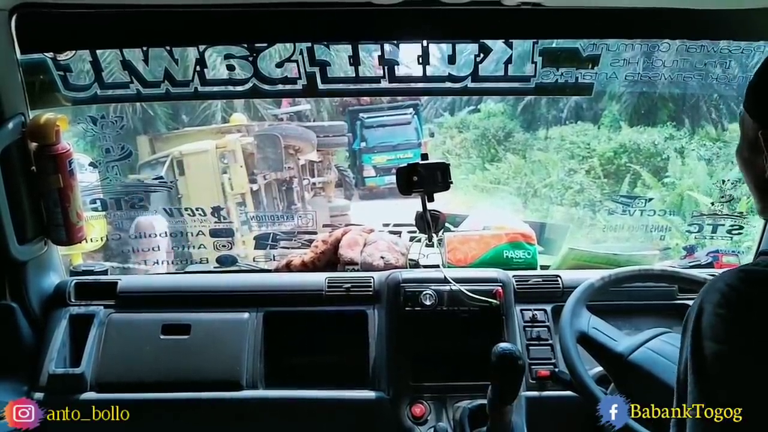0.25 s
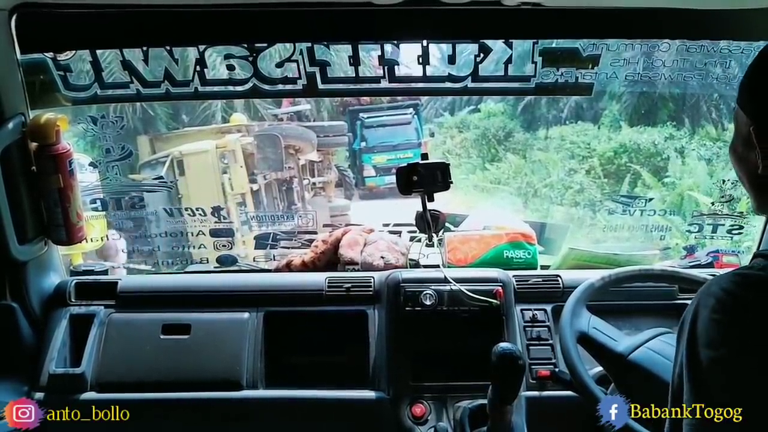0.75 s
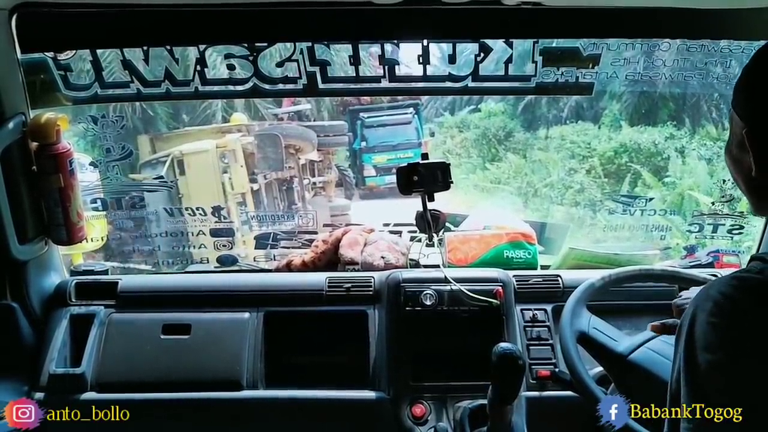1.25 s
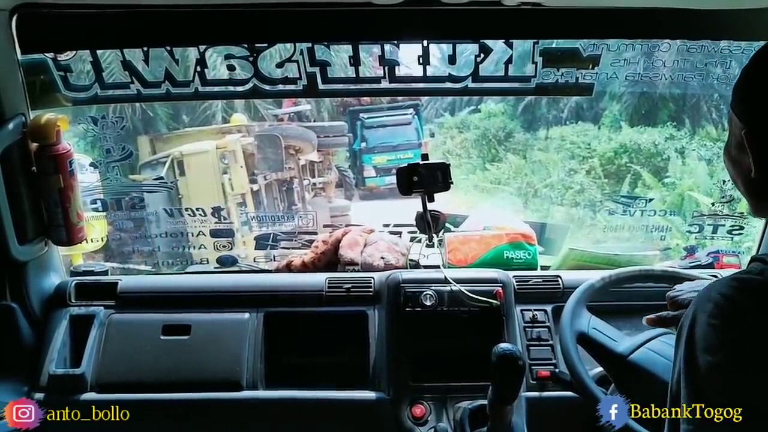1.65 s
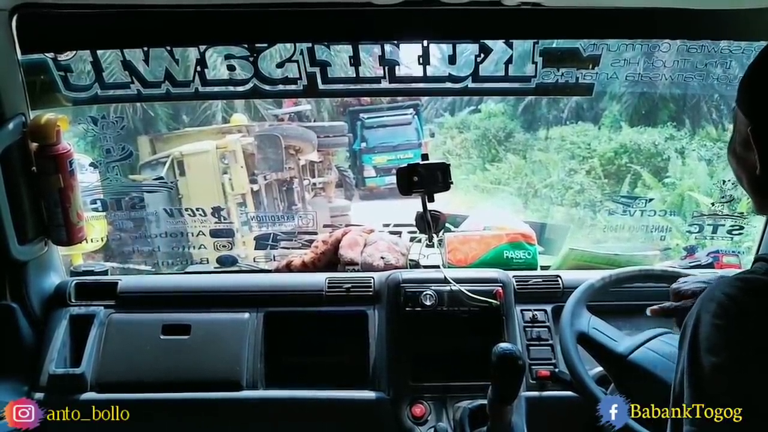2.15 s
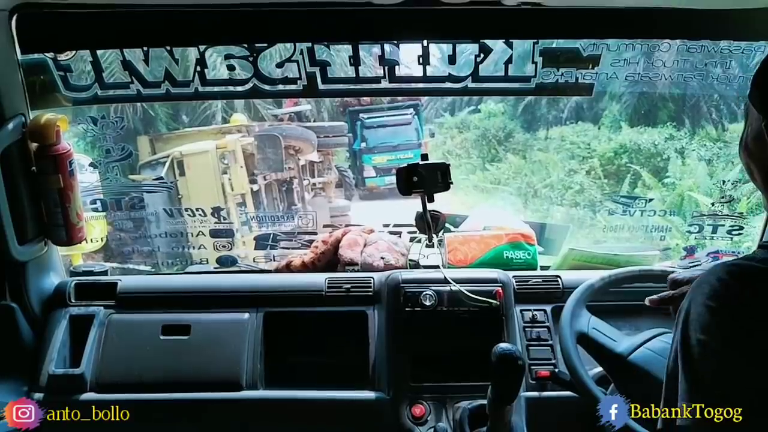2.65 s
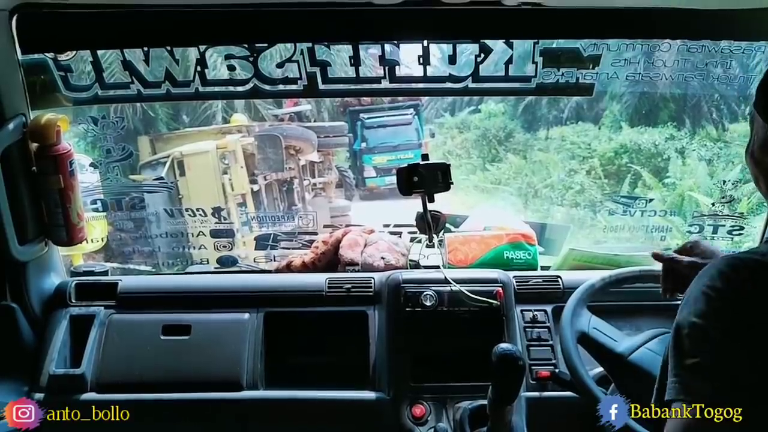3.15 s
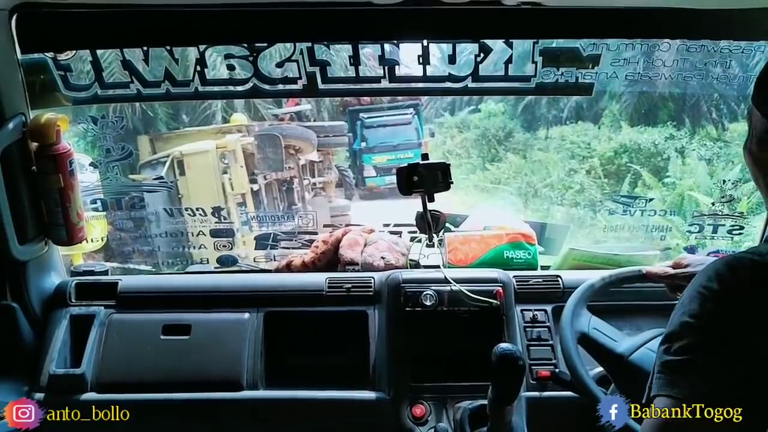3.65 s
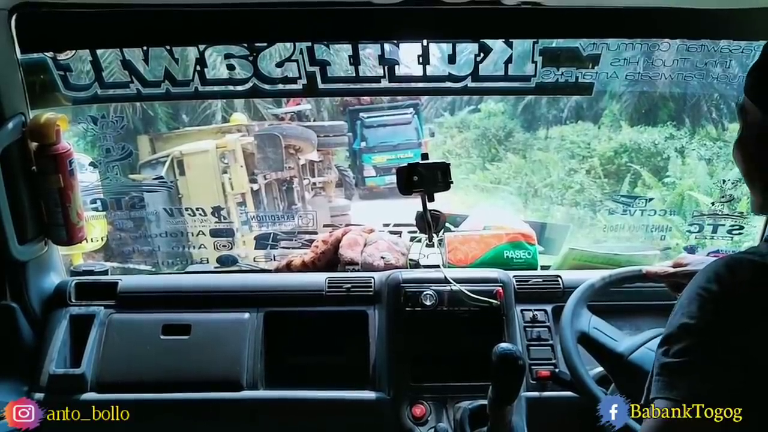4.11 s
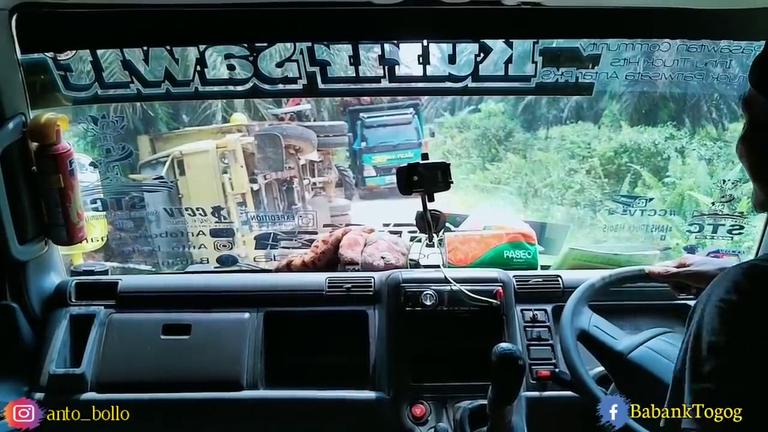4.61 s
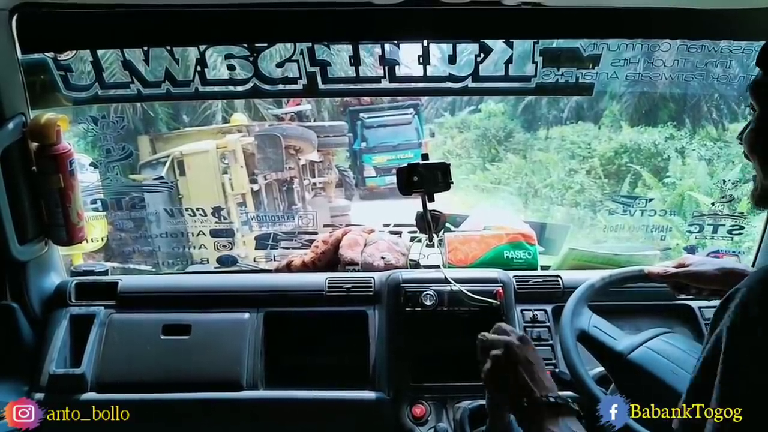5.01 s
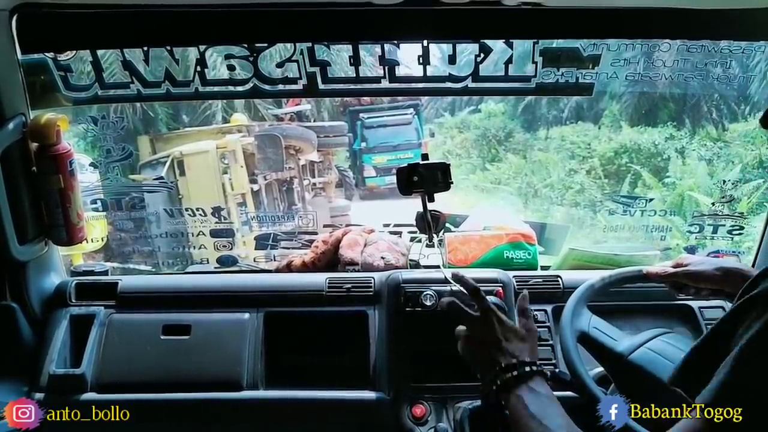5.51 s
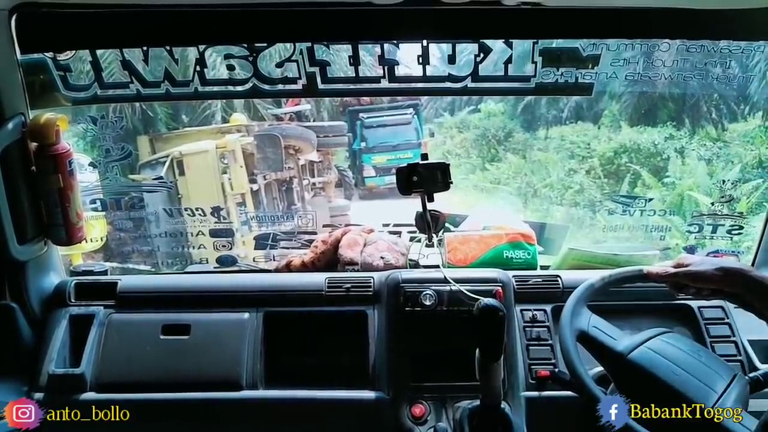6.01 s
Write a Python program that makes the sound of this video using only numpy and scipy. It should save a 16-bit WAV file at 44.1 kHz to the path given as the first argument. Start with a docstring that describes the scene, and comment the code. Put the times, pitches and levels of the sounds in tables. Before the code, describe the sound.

A loud two-note truck air horn holds about a second and a half, sags off, then a diesel idles with cab thumps before pulling away.

```python
"""Two truck horns, about a whole tone apart, hold one long note, then sag as the air runs out.
Each is a stack of sine partials plus escaping air; a valve cracks a noise burst as they open.
In the cab a diesel idles: jittered knocks ring the block, rattle the panels and shake the cab.
The driver shifts about and puts it in gear: thumps, rattling fittings and soft rustles.
At the end the cab starts to rumble along the road, with creaks and a low engine drone."""
import sys
import numpy as np
from scipy import signal
from scipy.fft import rfft, irfft
from scipy.io import wavfile
from scipy.ndimage import uniform_filter1d, minimum_filter1d

SR = 44100
rng = np.random.default_rng(int(sys.argv[2]) if len(sys.argv) > 2 else 0)


def waveform_to_disk(signal):
    """Save audio, clipped to [-1, 1], as 16-bit WAV at the path in sys.argv[1]."""
    frames = np.transpose(np.atleast_2d(signal))
    scaled = np.clip(frames, -1, 1) * 32767
    samples = np.round(scaled).astype(np.int16)
    wavfile.write(sys.argv[1], SR, samples)


N = 276507
T = np.arange(N) / SR
FREQS = np.maximum(np.arange(N // 2 + 1) * SR / N, 1)


def undb(db):
    """Decibels to gain."""
    return 10 ** (np.asarray(db) / 20)


def unit(x):
    """Scale to rms 1."""
    return x / np.sqrt(np.mean(x ** 2))


def colour(points, hz=FREQS):
    """Gain of a (Hz, dB) spectrum, joined by straight lines over log frequency."""
    f, db = np.transpose(points)
    return undb(np.interp(np.log(hz), np.log(f), db))


def shaped(x, gain):
    """Filter by a frequency response; rms 1."""
    return unit(irfft(rfft(x) * gain, N))


def noise(apart_hz=900):
    """Stereo noise, alike in the bass and drifting apart above apart_hz."""
    mid, side = rfft(rng.standard_normal((2, N)))
    side = side * FREQS / np.hypot(FREQS, apart_hz)
    return unit(irfft(np.array([mid + side, mid - side]), N))


def walk(rate_hz):
    """Smooth random wander of spread 1."""
    return shaped(rng.standard_normal(N), 1 / (1 + (FREQS / rate_hz) ** 4))


def swell(start_s, rise_s, decay_s):
    """A straight rise followed by an exponential decay."""
    rise = np.clip((T - start_s) / rise_s, 0, 1)
    return rise * np.exp(-np.maximum(T - start_s - rise_s, 0) / decay_s)


def resonances(modes):
    """Frequency response of (Hz, width Hz, dB) modes."""
    return sum(undb(db) / (1 + 2j * (FREQS / hz - hz / FREQS) * hz / (2 * width))
               for hz, width, db in modes)


def band(hz, octaves):
    """Frequency response of a flat-topped band; the gain halves at this many octaves either side."""
    return 1 / (1 + (np.log2(FREQS / hz) / octaves) ** 4)


def ringing(push, decay_s):
    """Pushes ring a body with many close modes, the same ones for every push."""
    body = (noise() * np.exp(-T / decay_s))[:, :SR // 5]
    return signal.fftconvolve(push[None], body)[:, :N]


SURGE_BELOW_HZ, SURGE_DB = 435, 4.5  # only the bass of the cab noise surges
# tone of the cab noise: pitch_hz, level_db (relative)
CAB_TONE = [(15, -5.5), (42, 2.5), (90, -12.5), (140, -12), (200, -24), (320, -16.5), (700, -22.5),
            (2800, -28), (4300, -36.5), (7000, -38.5), (9000, -34.5)]


def cab_noise():
    """Low cab noise: filtered noise with a surging bass and a steadier hiss above it."""
    bass = 1 / (1 + (FREQS / SURGE_BELOW_HZ) ** 4)
    low = undb(-44.0) * shaped(noise(apart_hz=600), colour(CAB_TONE) * bass) * undb(SURGE_DB * walk(15))
    hiss = shaped(noise(apart_hz=600), colour(CAB_TONE) * (1 - bass)) * undb(2.0 * walk(5.9))
    return low + undb(-59.5) * hiss


ROLL_S, ROLL_RISE_S, ROLL_DB = 5.972, .085, -24.5
LURCH_DB, LURCH_S = 5.5, 0.093  # extra level as the truck sets off, and how long it lasts
RUMBLE_DB, RUMBLE_LUMP_DB = -1, 3  # level within the roll, and random swing
CREAK_FROM_HZ, CREAK_DB, CREAK_LUMP_DB = 535, -16, 5.5  # creaks sit above the rumble
# tone of the moving cab: pitch_hz, level_db (relative)
ROAD_TONE = [(15, -3), (50, 2), (95, -7), (136, -5), (230, -17), (300, -12), (420, -34), (1500, -27),
             (2400, -29), (4000, -50), (7500, -47), (15500, -65)]
# engine drone as it pulls: pitch_hz, level_db (within the roll)
PULL_DRONE = [(33, -7), (65, -7), (133, -5)]


def road():
    """The truck rolls: lumpy low rumble, body creaks in uneven bursts, and the engine pulling."""
    age = np.maximum(T - ROLL_S, 0)
    lurch_db = LURCH_DB * np.exp(-(age / LURCH_S) ** 4)
    roll = np.minimum(age / ROLL_RISE_S, 1) * undb(ROLL_DB + lurch_db)
    rumble_tone = colour(ROAD_TONE) / (1 + (FREQS / CREAK_FROM_HZ) ** 4)
    rumble = shaped(noise(apart_hz=440) * undb(RUMBLE_LUMP_DB * walk(36)), rumble_tone)
    # bands half an octave apart creak each on their own, then ring briefly
    centres = CREAK_FROM_HZ * np.sqrt(2) ** np.arange(10)
    creaks = sum(colour(ROAD_TONE, hz) * np.sqrt(hz) * shaped(noise(), band(hz, 0.3))
                 * undb(CREAK_LUMP_DB * walk(13)) for hz in centres)
    creaking = unit(ringing(creaks[0], 0.01))
    drone = sum(undb(db) * np.sin(2 * np.pi * hz * T + 0.31 * walk(3.1)) for hz, db in PULL_DRONE)
    return (undb(RUMBLE_DB) * rumble + undb(CREAK_DB) * creaking + drone) * roll


# soft rustles as the driver moves:
# start_s, level_db, centre_hz, half_width_octaves, rise_s, decay_s
DRIVER_RUSTLES = [(3.263, -50, 11000, 0.66, .005, 0.16), (3.322, -39, 9000, 0.5, 0.005, 0.027),
                  (5.628, -46.5, 7800, 1, 0.0098, 0.059), (5.768, -49, 11200, .4, .007, .023),
                  (5.978, -43.5, 7300, 0.24, 0.022, 0.12)]


def rustles():
    """Soft rubbing: short bands of noise with a fine grain."""
    out = np.zeros((2, N))
    grain = undb(4 * walk(250))
    for start, db, hz, octaves, rise, decay in DRIVER_RUSTLES:
        out += undb(db) * swell(start, rise, decay) * shaped(noise() * grain, band(hz, octaves))
    return out


RING_WIDTH = 0.07  # share of the ring frequency
CONTACT_DB = -6  # the broad knock under a rattle's ring
# loose cab fittings: start_s, level_db, ring_hz
LOOSE_FITTINGS = [(2.588, -38.5, 291), (3.527, -41, 806), (3.588, -42, 730), (5.17, -43.5, 673),
                  (5.645, -37.5, 1100), (5.697, -42, 1030), (5.981, -33.5, 313), (6.007, -41, 800),
                  (6.078, -45, 1750), (6.106, -44, 2080)]


def rattles():
    """Loose fittings knock and ring: noise bursts through one narrow mode over a broad band."""
    out = np.zeros((2, N))
    for start, db, hz in LOOSE_FITTINGS:
        response = (resonances([(hz, hz * RING_WIDTH, 0)]) + undb(CONTACT_DB)) * band(hz, 0.69)
        out += undb(db) * swell(start, 0.0072, 0.028) * shaped(noise(), response)
    return out


BOOM_HZ, BOOM_OCTAVES, BOOM_DECAY_S = 127, 0.29, 0.071
BOOM_DB = -13.5  # relative to the thump
# the driver shifts, works the gear lever and pulls away: start_s, ring_hz, level_db, decay_s
DRIVER_THUMPS = [(2.319, 47, -29.5, 0.012), (3.023, 58, -25, 0.011), (3.203, 64.3, -31, 0.022),
                 (4.873, 141.8, -22, 0.049), (4.922, 190, -24.5, 0.013), (5.003, 48, -24, 0.043),
                 (5.037, 125, -28.5, 0.013), (6.014, 49.4, -22, 0.034)]


def thumps():
    """Dull decaying sine thumps; the cab floor answers every one with a noise boom."""
    out = np.zeros((2, N))
    boom = undb(BOOM_DB) * shaped(noise(), band(BOOM_HZ, BOOM_OCTAVES))
    for start, hz, db, decay in DRIVER_THUMPS:
        thump = swell(start, 0.0089, decay) * np.sin(2 * np.pi * hz * (T - start))
        out += undb(db) * (thump + swell(start, 0.0135, BOOM_DECAY_S) * boom)
    return out


# cab shaking with the engine: multiple of the knock rate, level_db
SHAKE_ORDERS = [(1, -50), (2, -53), (3, -52), (5, -62), (7, -57)]


def cab_shake(count):
    """The cab shakes with the engine: wavering sines at multiples of the knock rate."""
    out = np.zeros(N)
    for k, db in SHAKE_ORDERS:
        angle = 2 * np.pi * (k * count + rng.random()) + 0.56 * walk(5.1)
        out += undb(db + 0.82 * walk(3.5)) * np.sin(angle)
    return np.sqrt(2) * out


# cab panel resonances: pitch_hz, level_db
PANEL_MODES = [(385, -63), (540, -61), (830, -58.5), (1170, -61.5), (1660, -62.5), (2050, -66.5)]


def panel_buzz(age, shake_db, scatter):
    """Panels answer each knock a little late, and each time differently."""
    jolt = age * np.exp(-(age / 0.021) ** 2) * undb(shake_db)
    out = np.zeros((2, N))
    for hz, db in PANEL_MODES:
        response = resonances([(hz, hz / 16, 0)]) * band(hz, .5)
        out += undb(db) * shaped(noise() * jolt * undb(3 * scatter()), response)
    return out


# tone of the knock clatter: pitch_hz, level_db (relative)
CLATTER_TONE = [(400, -17), (1300, -18), (2100, -9), (2400, -2), (2900, 0), (3400, -7), (3900, -14),
                (4300, -35), (6800, -26), (8300, -39), (15000, -45)]


def clatter(age, force_db):
    """Each knock's short burst of pushes rings a dense set of modes."""
    push = rng.standard_normal(N) * np.exp(-age / .0045) * undb(force_db)
    return undb(-50) * shaped(ringing(push, .014), colour(CLATTER_TONE))


BLOCK_DB, MODE_SCATTER_DB = -46.5, 1.5  # scatter of the lowest mode; less for higher ones
COVER_HZ = 3580  # the engine cover holds back the block's ring above this
# modes of the engine block: pitch_hz, width_hz, level_db (relative)
BLOCK_MODES = [(296, 35, -3), (2380, 29, -7), (2560, 38, -3), (2750, 50, -5), (2970, 34, -6),
               (3310, 73, -10)]


def block_ring(knock, scatter):
    """Knocks strike the modes of the block, each time differently, the low ones most."""
    cover = 1 / (1 + (FREQS / COVER_HZ) ** 16)
    lowest_hz = BLOCK_MODES[0][0]
    out = np.zeros((2, N))
    for hz, width, db in BLOCK_MODES:
        strike = undb(MODE_SCATTER_DB * (lowest_hz / hz) ** 0.21 * scatter())
        out += undb(db) * shaped(noise() * knock * strike, resonances([(hz, width, 0)]) * cover)
    return undb(BLOCK_DB) * unit(out)


IDLE_HZ, FAST_IDLE_HZ = 16.905, 17.16  # knocks per second
FAST_FROM_S, FAST_UNTIL_S = 2.2, 4.32  # for a while the idle runs faster
FIRST_KNOCK_S = -.0115  # before jitter
KNOCK_JITTER_S, KNOCK_SCATTER_DB = 0.00051, 1.4
KNOCK_RISE_S, KNOCK_DECAY_S = .0025, .024
EASE_FROM_S, EASE_DB_PER_S = 0.99, 1.16  # force of the knocks: steady, then easing off
SLOW_IDLE_SHAKE_DB = 4.5  # the panels shake harder once the idle drops again
TICK_HZ, TICK_OCTAVES, TICK_DB = 6930, 0.12, -68.5
# knock force of each cylinder, in firing order: level_db
CYLINDER_FORCE = [4, 1.5, 3, -0.5]


def diesel():
    """Combustion knocks, uneven from cylinder to cylinder, ring the block and shake the cab."""
    rate = np.where((T > FAST_FROM_S) & (T < FAST_UNTIL_S), FAST_IDLE_HZ, IDLE_HZ)
    count = np.cumsum(rate) / SR + (KNOCK_JITTER_S * walk(9.9) - FIRST_KNOCK_S) * IDLE_HZ
    index = count.astype(int)
    age = count % 1 / rate  # seconds since the last knock
    cylinder_db = np.array(CYLINDER_FORCE)[index % len(CYLINDER_FORCE)]

    def scatter():
        """One random value for each knock."""
        return rng.standard_normal(index[-1] + 1)[index]

    ease_db = -EASE_DB_PER_S * np.maximum(T - EASE_FROM_S, 0)
    force_db = ease_db + KNOCK_SCATTER_DB * scatter() + cylinder_db
    knock = np.minimum(age / KNOCK_RISE_S, 1) * np.exp(-(age / KNOCK_DECAY_S) ** 1.5) * undb(force_db)
    shake_db = force_db + cylinder_db / 2 + SLOW_IDLE_SHAKE_DB * (T > FAST_UNTIL_S)
    # a faint high tick with each knock
    tick_noise = noise() * np.sqrt(knock) * undb(3.3 * scatter() + 2 * walk(120))
    tick = undb(TICK_DB) * shaped(tick_noise, band(TICK_HZ, TICK_OCTAVES))
    engine = block_ring(knock, scatter) + clatter(age, force_db) + tick
    return engine + panel_buzz(age, shake_db, scatter) + cab_shake(count)


OPEN_S, CLOSE_S = .2047, 1.813  # the horn valve opens and closes
# tone of the valve crack: pitch_hz, level_db (relative)
CRACK_TONE = [(110, -44), (550, 4.5), (893, -5), (1480, -5), (1600, -8.5), (2450, -3.5), (2970, -6),
              (3900, -21.5), (6590, -13.5), (7840, -24.5), (15500, -43.5)]
# puffs of air from the horn line:
# start_s, level_db, centre_hz, half_width_octaves, rise_s, decay_s
AIR_PUFFS = [(0.253, -45.5, 10050, 0.37, 0.016, 0.025), (.255, -31, 7020, 0.1, 0.012, 0.017),
             (1.78, -34, 6640, 0.29, 0.0025, 0.021), (2.125, -41.5, 2030, 0.37, 0.068, 0.08),
             (2.13, -39.5, 1990, 0.017, 0.026, 0.085)]


def valve():
    """The valve slams open: a noise crack with a faint tail; the line puffs as it fills and empties."""
    tail = undb(-22) * swell(0.191, 0.04, 0.15)
    burst = swell(OPEN_S, 0.0014, 0.013) + tail
    out = undb(-7.0) * burst * shaped(noise(apart_hz=1230), colour(CRACK_TONE))
    for start, db, hz, octaves, rise, decay in AIR_PUFFS:
        out += undb(db) * swell(start, rise, decay) * shaped(noise(), band(hz, octaves))
    return out


BLEED_S = 0.41  # the air line empties in this time
SAG = .024  # share of its pitch that a horn loses as the line empties
BLOOM_S = 0.12  # the upper partials come in this slowly


def line_pressure():
    """Air behind the horns, 0-1: full until the valve closes, then bleeding away."""
    return np.clip(1 - (T - CLOSE_S) / BLEED_S, 0, 1)


def pitch(settled_hz, sharp_hz, half_settled_s):
    """A horn starts sharp, settles, and sags with the pressure."""
    held_hz = settled_hz + sharp_hz / (1 + np.maximum(T - OPEN_S, 0) / half_settled_s)
    return held_hz * (1 - SAG * (1 - line_pressure()))


def blow(delay_s, attack_s, level_power, brightness, bright_power, stall_edge):
    """Horn strength and the multiple above which partials fall away, from powers of the pressure."""
    age = np.maximum(T - OPEN_S - delay_s, 0)
    pressure = (1 - np.exp(-age / attack_s)) * line_pressure()
    edge = brightness * pressure ** bright_power * (1 - np.exp(-age / BLOOM_S))
    return pressure ** level_power, stall_edge + edge


def swing(hz, other_hz, pull, waver):
    """Phase of a diaphragm; over the shared air line each horn tugs the other at their beat rate."""
    phase = 2 * np.pi * np.cumsum(hz * (1 + waver * walk(83))) / SR
    return phase + pull * np.sin(2 * np.pi * np.cumsum(other_hz - hz) / SR)


LEFT_LEAD = 1.6  # radians by which the left side leads for the buzz and the sum tones


def stereo_sine(angle, left_db, right_db, lead):
    """One sine on both sides, the left leading by some radians."""
    return np.array([undb(left_db) * np.sin(angle + lead), undb(right_db) * np.sin(angle)])


# sum tones: multiple of the low note, multiple of the high note, left_db, right_db
AIR_LINE_SUMS = [(1, 1, -35, -47), (2, 1, -43, -46), (3, 1, -38, -50), (2, 2, -39, -38), (1, 4, -48, -38),
                 (5, 1, -47, -36)]


def sum_tones(low_phase, high_phase, low_blow, high_blow):
    """The horns modulate each other through the shared air line; needs both blowing hard."""
    drive, edge = low_blow[0] * high_blow[0], np.minimum(low_blow[1], high_blow[1])
    out = np.zeros((2, N))
    for m, n, left_db, right_db in AIR_LINE_SUMS:
        angle = m * low_phase + n * high_phase + rng.uniform(0, 2 * np.pi)
        size = undb(walk(27)) / np.hypot(1, ((m + n) / edge) ** 2)
        out += size * stereo_sine(angle, left_db, right_db, LEFT_LEAD)
    return np.sqrt(2) * drive * out


STALL_FLUTTER_DB = 2.25  # flutter gained by the fundamental as the air runs out
BUZZ_FLUTTER_DB = 3.2
# cab standing waves that sagging partials slide through: pitch_hz, half_width_hz, level_db
CAB_WAVES = [(645, 7, -12), (1075, 10, -8), (1452, 11, 6), (1634, 7, -5), (1815, 11, -15), (1955, 14, 4),
             (2168, 22, -8)]
# upper partials of both horns: pitch_hz, level_db (relative)
BUZZ_TONE = [(3640, -15), (3980, -21), (4620, -15), (5290, -28), (5610, -11), (6590, -14), (6940, -19),
             (7300, -11), (7600, -16), (7950, -30)]
# air rushing through the horns: pitch_hz, level_db (relative)
AIR_TONE = [(120, -27), (200, -16), (330, -2), (480, -15), (660, -15), (850, -27), (1300, -18),
            (2100, -19.5), (2750, -24), (3500, -32), (4300, -49), (5400, -52), (7200, -42), (8500, -62)]


def horn(phase, drive, edge, partials, buzz_db, air_db, flutter_db):
    """A diaphragm chops the air into a trumpet; as pressure falls it sags and loses upper partials."""
    hz = uniform_filter1d(np.gradient(phase), size=SR // 10) * SR / (2 * np.pi)
    flutter = flutter_db + STALL_FLUTTER_DB * (1 - line_pressure()) ** 2
    out = np.zeros((2, N))
    for k, left_db, right_db, lead in partials:
        size = undb(flutter * np.sqrt(k) * walk(57)) / np.hypot(1, (k / edge) ** 3)
        # only the peaks and nulls near where the partial starts
        wave_db = sum(db / (1 + ((k * hz - f) / width) ** 4)
                      for f, width, db in CAB_WAVES if abs(k * hz[0] - f) < f / 20)
        size *= undb(wave_db)
        angle = k * phase + rng.uniform(0, 2 * np.pi)
        out += size * stereo_sine(angle, left_db, right_db, lead)
    for k in range(partials[-1][0] + 1, 27):
        level = colour(BUZZ_TONE, k * hz[0]) * undb(buzz_db + BUZZ_FLUTTER_DB * walk(47))
        size = level / np.hypot(1, (k / edge) ** 3)
        angle = k * phase + rng.uniform(0, 2 * np.pi)
        out += size * stereo_sine(angle, 0, 0, LEFT_LEAD)
    # air escapes once a cycle
    pulsed_air = shaped(noise() * (1 + 0.49 * np.cos(phase)), colour(AIR_TONE))
    air = pulsed_air * undb(air_db) * edge / (edge + 4)
    return drive * (np.sqrt(2) * out + air)


# partials of the low horn: multiple, left_db, right_db, left_lead_radians
LOW_HORN = [(1, -13.7, -13.7, -0.4), (2, -22.3, -21.3, 0.7), (3, -41, -32, 2.0), (4, -26.5, -28, 2.8),
            (5, -34, -25, -1.8), (6, -37, -24, 3.0), (8, -38, -37, -0.9), (9, -37, -34, 2.7),
            (10, -40, -34, -2.6)]
# partials of the high horn: multiple, left_db, right_db, left_lead_radians
HIGH_HORN = [(1, -12, -24, 1.0), (2, -35, -44, -2.8), (3, -35, -27, -1.3), (4, -18, -23, 3.0),
             (5, -22.3, -17.3, -1.6), (6, -25, -28, -0.4), (7, -31, -31, -1.4), (8, -32, -46, 2.4),
             (9, -40, -53, -1.2)]


def horns():
    """Two horns on one air line: each sounds its own partials, and together they add sum tones."""
    low_hz = pitch(settled_hz=328.8, sharp_hz=1.7, half_settled_s=.7)
    high_hz = pitch(settled_hz=367.2, sharp_hz=5.5, half_settled_s=.17)
    low_blow = blow(delay_s=0.034, attack_s=0.03, level_power=1.85,
                    brightness=95, bright_power=6.7, stall_edge=1.27)
    high_blow = blow(delay_s=0.019, attack_s=0.043, level_power=1.4,
                     brightness=58, bright_power=4.7, stall_edge=2.6)
    low_phase = swing(low_hz, high_hz, pull=.015, waver=.0011)
    high_phase = swing(high_hz, low_hz, pull=.025, waver=.0011)
    low = horn(low_phase, *low_blow, LOW_HORN, buzz_db=-43, air_db=-32, flutter_db=.25)
    high = horn(high_phase, *high_blow, HIGH_HORN, buzz_db=-53, air_db=-35, flutter_db=.25)
    return low + high + sum_tones(low_phase, high_phase, low_blow, high_blow)


def scene():
    """Both horns over the idling truck."""
    background = cab_noise() + road()
    driver = rustles() + rattles() + thumps()
    return background + driver + diesel() + valve() + horns()


LIMITER_S, TOP_HZ = .004, 15650


def record(dry):
    """A limiter turns down peaks that would pass full scale; the top is cut."""
    size = int(LIMITER_S * SR)
    peak_gain = 1 / np.maximum(np.abs(dry).max(axis=0), 1)
    gain = uniform_filter1d(minimum_filter1d(peak_gain, size), size)
    top_cut = signal.ellip(10, .1, 90, TOP_HZ, fs=SR, output="sos")
    return signal.sosfilt(top_cut, dry * gain)


dry = scene()
out = record(dry)
waveform_to_disk(out)
```